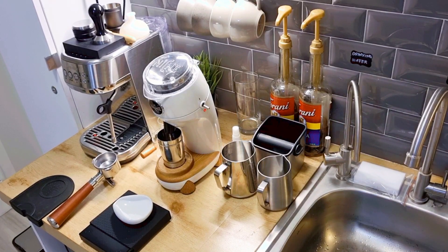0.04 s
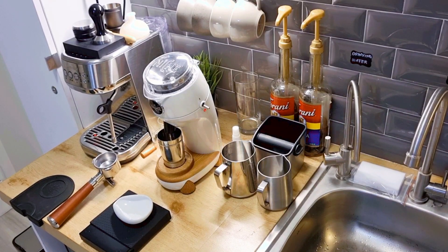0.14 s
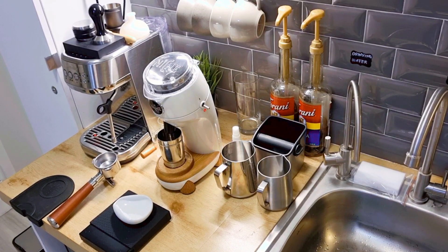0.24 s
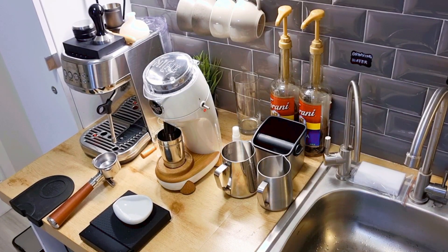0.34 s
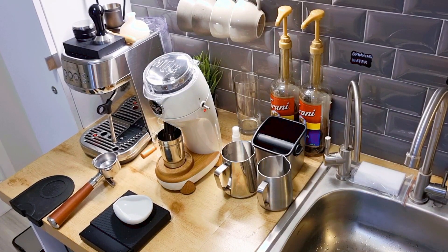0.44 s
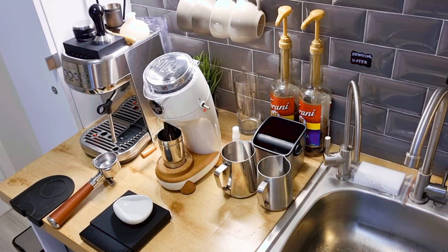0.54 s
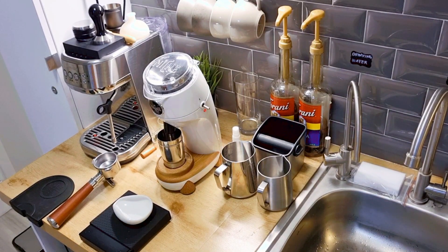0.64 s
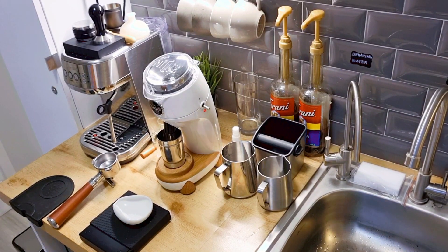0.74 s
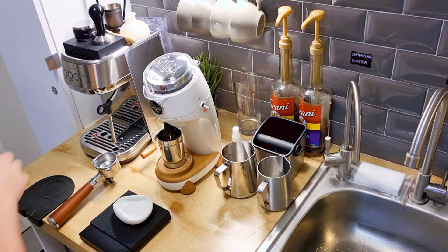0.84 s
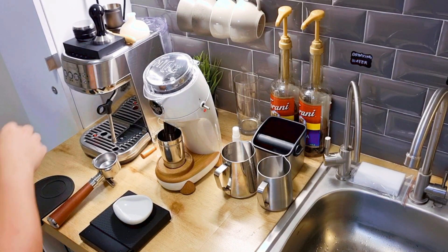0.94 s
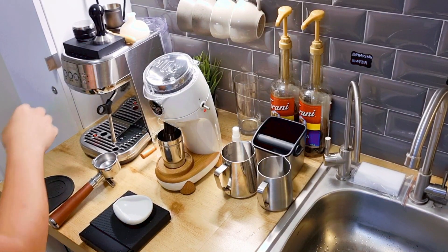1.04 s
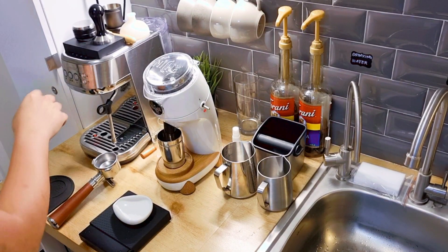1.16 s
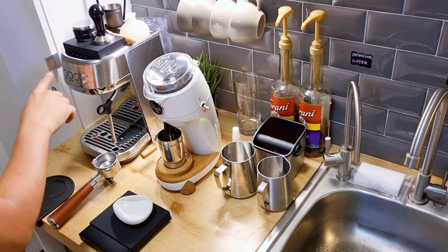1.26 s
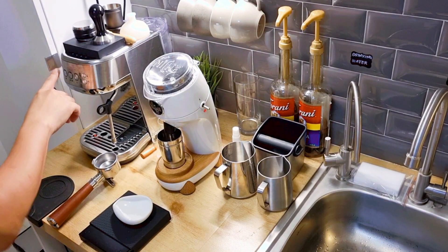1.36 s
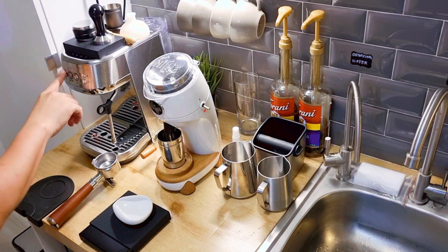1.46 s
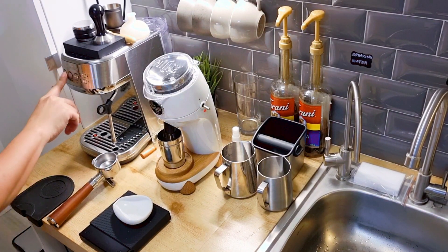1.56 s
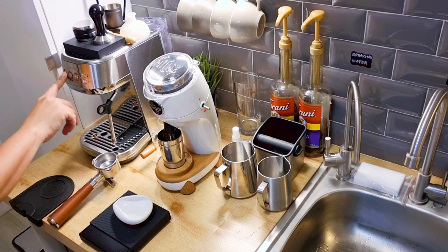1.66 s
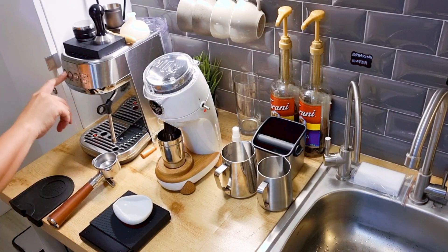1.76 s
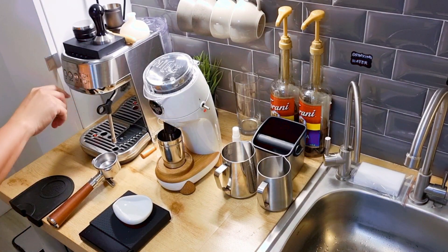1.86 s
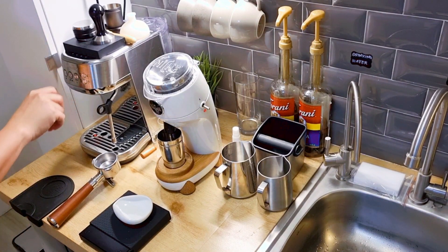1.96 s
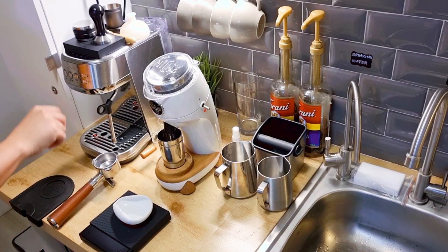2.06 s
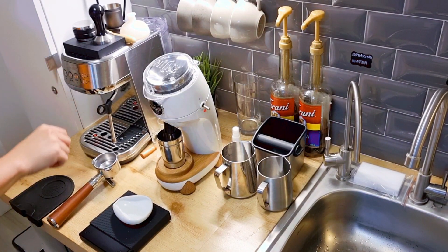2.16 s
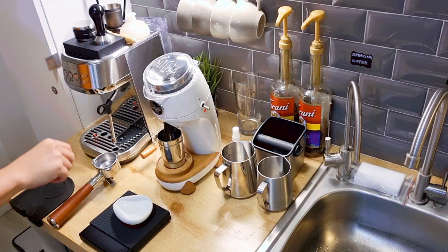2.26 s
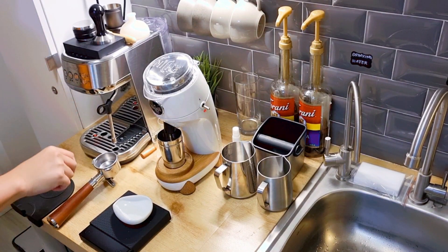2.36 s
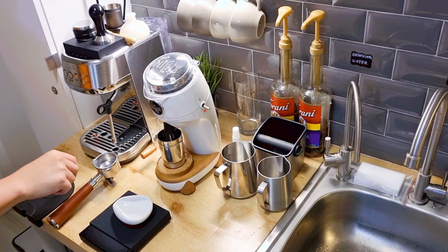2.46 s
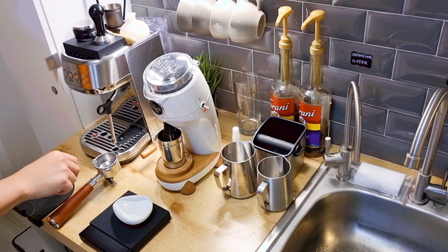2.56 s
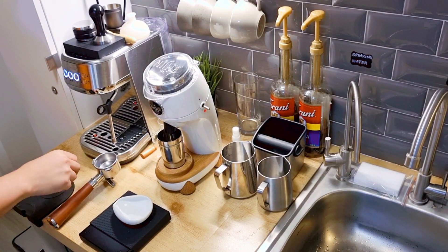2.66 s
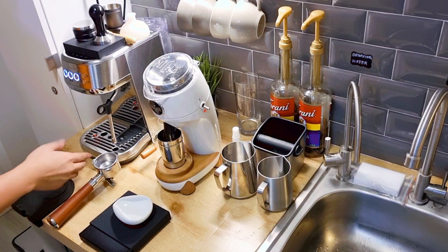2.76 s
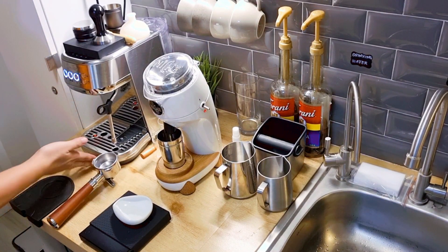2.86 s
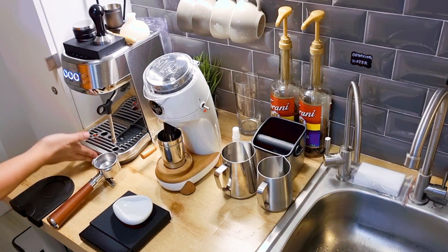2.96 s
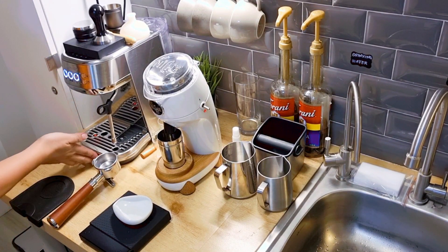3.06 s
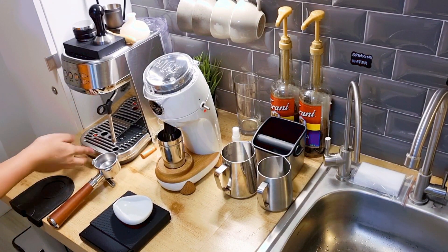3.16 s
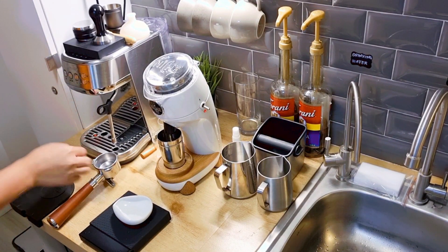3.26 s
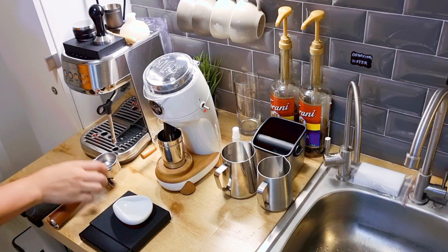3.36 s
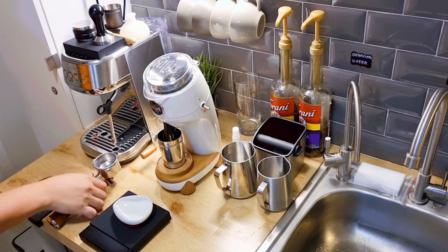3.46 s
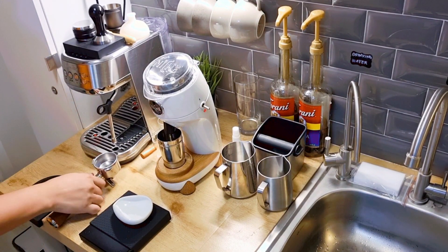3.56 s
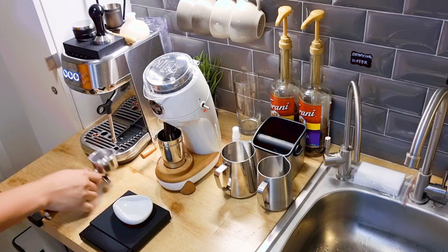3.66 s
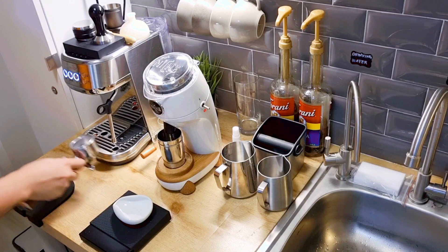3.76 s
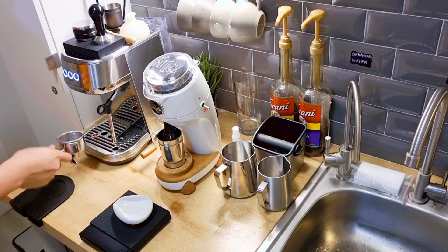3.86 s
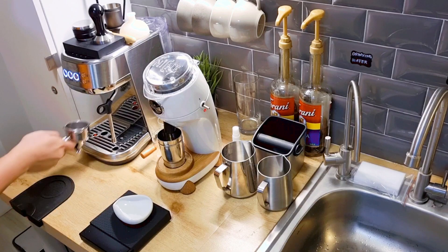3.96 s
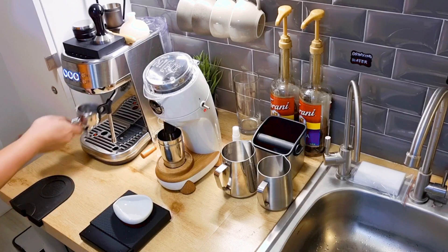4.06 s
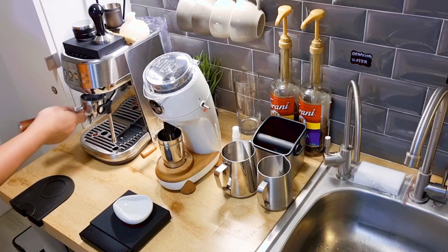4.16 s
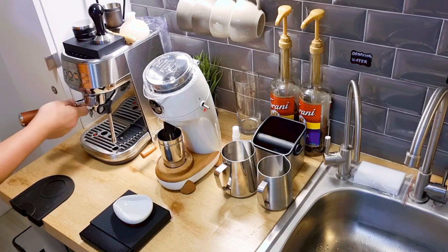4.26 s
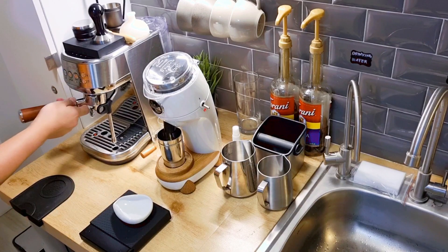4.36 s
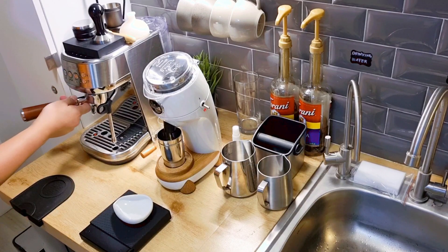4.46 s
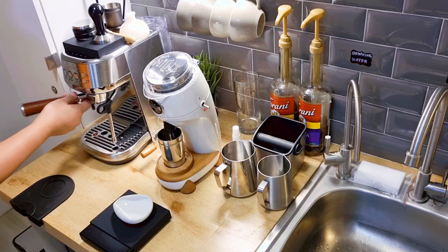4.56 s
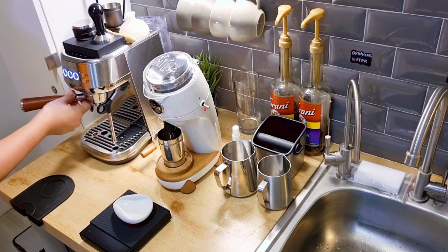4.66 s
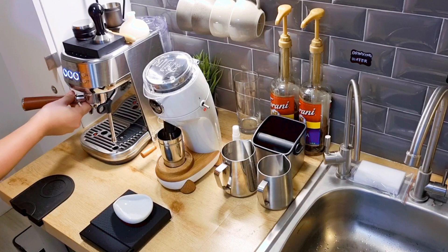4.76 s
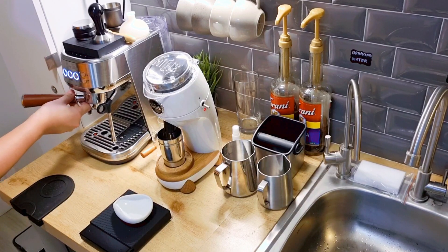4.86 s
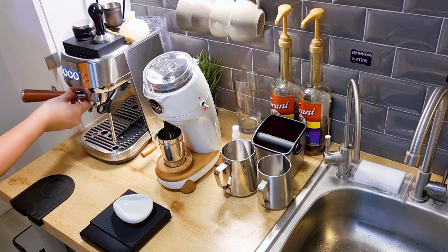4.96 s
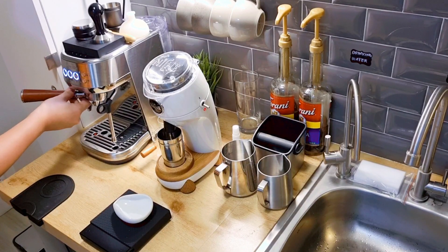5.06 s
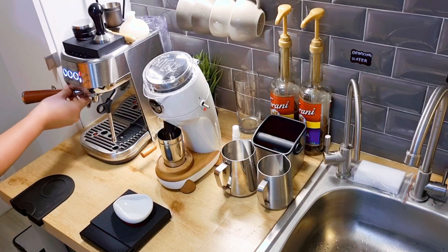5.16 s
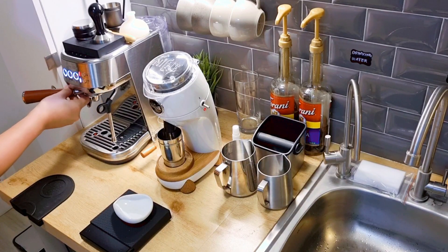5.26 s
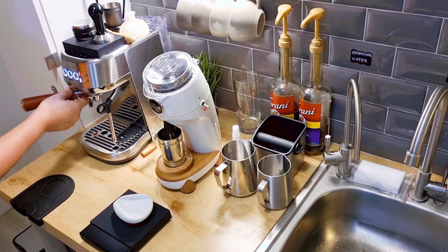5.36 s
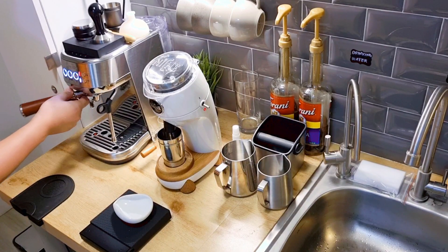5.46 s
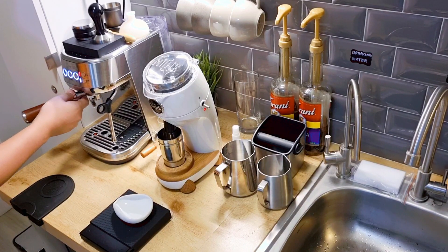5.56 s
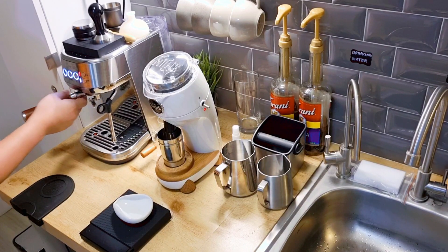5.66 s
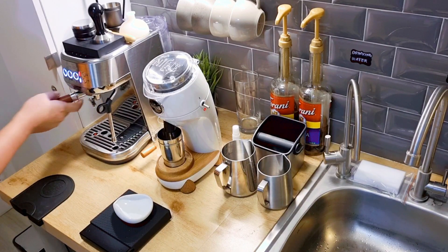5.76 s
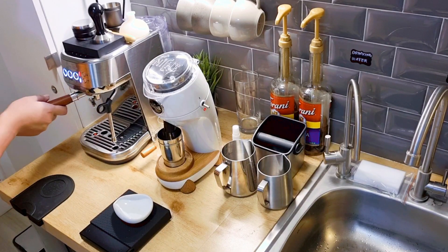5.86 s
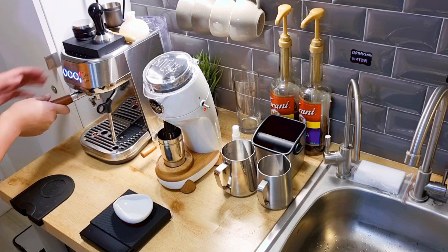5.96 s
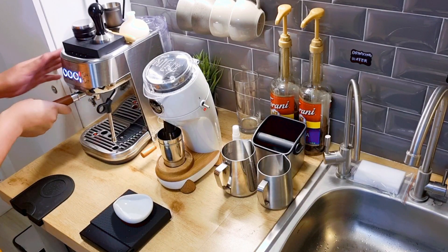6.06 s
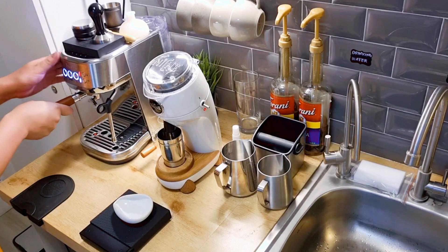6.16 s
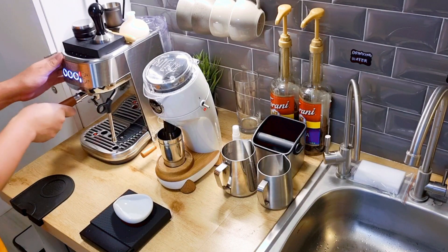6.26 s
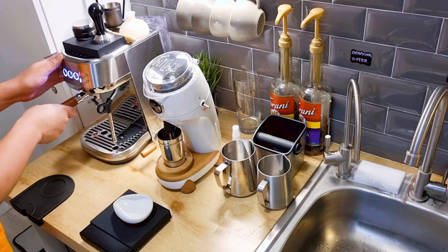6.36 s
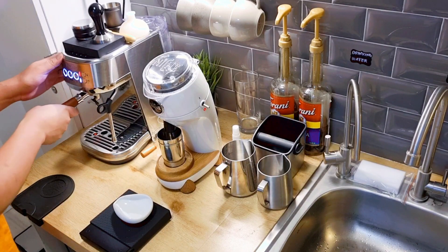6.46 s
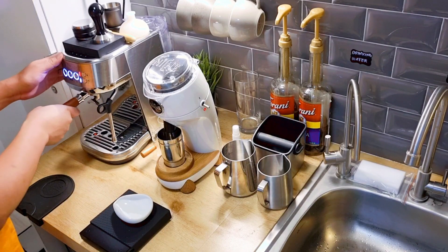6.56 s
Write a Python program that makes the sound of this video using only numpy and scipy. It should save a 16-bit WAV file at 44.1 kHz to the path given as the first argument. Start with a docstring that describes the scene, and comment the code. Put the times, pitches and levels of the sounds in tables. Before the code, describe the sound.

A low appliance hum fills a small tiled kitchen. Clothing rustles softly, a button ticks, and an espresso machine switches on with a quick cluster of plastic clicks. After another click and some soft rubbing, a steel portafilter clanks against the machine, rings briefly, and is twisted into place with knocks and dull thuds. A faint finger slide and small ticks follow. The nearby stereo microphone catches short room reflections.

```python
"""A small tiled kitchen, where an espresso machine is readied over a low appliance hum.
Clothes rustle as an arm reaches out, the power button snaps and the machine clicks on.
A steel portafilter is picked up, clanks against the group head and is knocked and twisted into its seat:
the steel rings, the housing thuds, and fingers slide off with a whisper. The tiles echo the hits."""
import sys
import numpy as np
from scipy import signal
from scipy.fft import rfft, irfft, next_fast_len
from scipy.io import wavfile
from scipy.ndimage import uniform_filter1d

SR = 44100
rng = np.random.default_rng(int(sys.argv[2]) if len(sys.argv) > 2 else 0)


def unload_wav(signal):
    """Save mono or channel-first audio to the path in sys.argv[1] as 16-bit WAV at rate SR, clipped to [-1, 1]."""
    wavfile.write(
        sys.argv[1],
        SR,
        np.round(np.clip(np.atleast_2d(signal).T, -1, 1) * 32767).astype(np.int16),
    )


N = 291501
TIME = np.arange(N) / SR
HIT_TIME = TIME[:SR * 3 // 4]   # time axis of one hit and its tail

# portafilter hits on the group head: (time [s], level of clank, lugs and steel ring [dB], thud level [dB], #
# brightness [dB/octave], chatter decay [s], freedom to ring [0-1])
KNOCKS = [(4.326, -24.5, -40, 3, 0.0028, 0.7), (4.3293, -20, -16, -3, 0.0049, 0.84),
          (4.346, -27, -42, 1, 0.0034, .5), (4.384, -57, -26.5, 3, .003, 0.23),
          (4.44, -56, -24.5, 3, 0.0031, 0.08), (4.541, -50, -33.5, -2, 0.0023, 0.47),
          (4.638, -46.5, -35, -3.5, 0.0034, 0.35), (4.853, -60.5, -38.5, 0.5, .003, 0.6),
          (5.012, -47, -29, -6, 0.0011, 0.44), (5.075, -48.5, -45.5, -5, 0.0045, 0),
          (5.206, -28.5, -19, -3.5, 0.0051, 0.36), (5.252, -35.5, -23.5, -4, 0.0088, 0.4),
          (5.383, -39, -43, -6.5, 0.0014, 0.3), (5.426, -47, -33, -6.5, 0.0033, 0.5),
          (5.469, -54, -37.5, -7, .003, .7), (5.519, -32.5, -34, -6, 0.0036, 0.5),
          (5.546, -27, -30, -3.5, 0.013, 0.33), (5.57, -39, -28.5, -5, .006, 0.4),
          (5.645, -52, -31, -4.5, .005, 0.73)]
# EQ of steel striking steel: (frequency [Hz], gain [dB])
CLANK_EQ = [(80, -6), (400, -2), (720, 0), (1100, -1), (1600, -2), (2400, -5), (3400, -5), (5000, -2),
            (6200, -4), (8000, -1), (12000, -4), (15000, -3)]
# ring of the portafilter's steel: (frequency [Hz], level [dB], ungripped t60 [s])
STEEL_MODES = [(990, -3, .35), (1028, 3.5, .4), (1065, 14, .08), (1092, 1.5, .3), (1157, 4, .3),
               (1220, 6, .08), (1430, 4, .1), (1490, -6, .38), (1762, 1, .28), (2320, 4, .17),
               (2374, 2, .38), (3270, -3, .13), (3591, -8, .28), (4530, 3, .16), (4640, 1, .3),
               (4782, 7, .36), (4850, 5, .22), (4915, 3, .38), (5518, -3, .26), (7246, -6, .3)]
# ring of the locking lugs, pressed into their seat: (frequency [Hz], level [dB], t60 [s])
LUG_MODES = [(1380, -9.5, 0.13), (1820, 2.5, 0.3), (1935, -2.5, 0.24), (2580, -4.5, .16), (2780, 4, 0.25),
             (3240, 1.5, 0.21)]
# low body of the machine's housing: (frequency [Hz], level [dB], ungripped t60 [s])
HOUSING_MODES = [(114, -20.5, 0.69), (229.6, -15, 0.22), (264, 1.5, 0.14), (260, -19, 0.78),
                 (278, -17.5, 0.52), (316, -14.5, 0.35), (379.6, -12.5, 0.3), (431, -23.5, 0.63),
                 (494, -16.5, 0.25)]


def portafilter(attack_s=0.0012, steel_db=5, lugs_db=-15, grip_power=4.7):
    """Each knock layers a clank, a ring and a housing thud; a firm grip trades steel ring for lugs."""
    out = np.zeros((2, N))
    attack = 1 - np.exp(-HIT_TIME / attack_s)   # heavy parts take a moment to start moving
    for s, level_db, thud_db, tilt_db, chatter_s, freedom in KNOCKS:
        clank = kitchen(equalise(contact(chatter_s), CLANK_EQ), direct_db=19, room_db=30)
        steel = ring(STEEL_MODES, freedom, spread_db=1, spread_rad=.4)
        steel = kitchen(steel, direct_db=-12, room_db=-19)
        steel *= from_db(steel_db) * freedom ** grip_power * attack
        lugs = ring(LUG_MODES, freedom=1, spread_db=3.5, spread_rad=.8)
        lugs *= from_db(lugs_db) * (1 - freedom)
        tilt_eq = [(hz, level_db + tilt_db * np.log2(hz / 1500)) for hz in (500, 16000)]
        add(out, s, equalise(clank + lugs + steel, tilt_eq))
        thud = from_db(thud_db) * attack * ring(HOUSING_MODES, freedom, spread_db=2, spread_rad=0.68)
        add(out, s, kitchen(thud, direct_db=1.5, room_db=-2.5))
    return out


# button, switch and light handling clicks: (time [s], thump [dB], body [dB], mid [dB], snap [dB],
# treble [dB], chatter decay [s], direct level [dB])
CLICKS = [(.851, -35, -39, -46, -59, -70, .012, -11), (1.4177, -41, -39, -35, -34.5, -31.5, 0.00079, -19),
          (1.708, -54, -57, -52, -41.5, -59, .0007, -3),
          (1.7783, -18.5, -21.5, -39, -41.5, -47, 0.001, -15),
          (1.794, -52, -52, -27, -39, -36, 0.0099, -20),
          (1.806, -31, -20.5, -25.5, -38, -46, 0.00054, -4.5),
          (1.812, -31.5, -23.5, -28, -31.5, -35, 0.0075, -9),
          (1.829, -32, -30.5, -33.5, -38, -47, .005, -11), (1.883, -26, -25.5, -33, -53, -49, .003, -9),
          (3.0299, -33.5, -37.5, -33.5, -34, -34.5, 0.0015, -14),
          (3.0436, -32.5, -27, -29, -37.5, -37, .004, -17), (3.266, -53, -46, -44.5, -64, -73, .013, -17),
          (6.346, -51, -44.5, -54, -57, -66, 0.0044, -10), (6.4194, -56, -66, -39.5, -50, -55, .0008, -7)]
# EQ points for thump, body, mid, snap and treble: (frequency [Hz])
CLICK_BANDS_HZ = (250, 560, 1700, 3800, 6500)
# ring of the panels around the buttons: (frequency [Hz], level [dB], t60 [s])
PANEL_MODES = [(336, -13, 0.27), (440, -3.5, 0.15), (597, -2, 0.24), (805, 1, 0.17), (887, -4, 0.072),
               (985, -2, 0.07), (1055, 1, 0.16), (1378, 0.5, 0.1), (1675, 0, 0.11), (2140, -6, .12),
               (3080, -15, 0.12), (4230, -7, 0.13)]
# EQ over all the clicks: (frequency [Hz], gain [dB])
CLICK_EQ = [(150, -18.5), (260, 0.5), (400, 5.5), (600, 2.5), (850, 0.5), (1300, -2), (1900, -0.5),
            (2900, 0.5), (4000, 3.5), (6000, 7), (15000, 6)]


def clicks(gain_db=33, panel_db=-44):
    """Plastic parts snap and set the panels ringing briefly; the room gives them their tail."""
    out = np.zeros((2, N))
    for s, *bands_db, chatter_s, direct_db in CLICKS:
        snap = kitchen(contact(chatter_s), direct_db, room_db=2)
        panel = from_db(panel_db) * ring(PANEL_MODES, freedom=1, spread_db=-1, spread_rad=0.89)
        add(out, s, equalise(snap + panel, list(zip(CLICK_BANDS_HZ, bands_db))))
    return from_db(gain_db) * equalise(out, CLICK_EQ)


# cloth swishes, one per arm stroke: (start [s], length [s], relative peak [dB], extra sheen [dB])
SWISHES = [(0.032, 0.44, -71, -2.5), (0.46, 0.21, -61, 2), (0.694, 0.15, -59.5, -3),
           (0.83, 0.068, -55.5, -6), (1.166, 0.23, -50.5, -0.5), (1.382, 0.07, -58, 3.5),
           (1.565, 0.19, -61, -0.5), (1.832, 0.082, -53, 2), (2.018, 0.38, -76.5, 2),
           (5.908, 0.13, -70.5, -2)]
# EQ of the cloth's hiss: (frequency [Hz], gain [dB])
CLOTH_EQ = [(300, -18), (900, -4.5), (1800, -10), (3200, -5.5), (5000, 3), (7500, 0.5), (12000, 7.5),
            (16000, 5.5)]


def sleeve(gain_db=22, grain_db=-0.5, folds_db=1.54, weave_db=-15, sheen_above_hz=8000):
    """Fibres catch and slip: a grainy hiss and sheen ride the arm's speed, uneven as the folds pass."""
    body_power = sheen_power = 0
    for s, length_s, db, sheen_db in SWISHES:   # each dies away in the room, its sheen first
        body_power += from_db(db + stroke_db(s, length_s, fade_db_per_s=128.5)) ** 2
        sheen_power += from_db(db + sheen_db + stroke_db(s, length_s, fade_db_per_s=220)) ** 2
    grain = unit_rms(uniform_filter1d(rng.standard_normal(N), size=200))
    folds = unit_rms(uniform_filter1d(rng.standard_normal(N), size=1500))
    hiss = shaped_noise(CLOTH_EQ)
    sheen = signal.sosfiltfilt(signal.butter(2, sheen_above_hz, "high", fs=SR, output="sos"), hiss)
    envelope = np.sqrt(body_power)
    body = envelope * (hiss - sheen + from_db(weave_db) * weave(envelope))
    texture = from_db(gain_db + grain_db * grain + folds_db * folds)
    return texture * (body + np.sqrt(sheen_power) * sheen)


def stroke_db(start_s, length_s, fade_db_per_s, speed_power=1.6):
    """Envelope of one arm stroke: the level follows a half sine of speed, then a steady release."""
    speed = np.sin(np.pi * np.clip((TIME - start_s) / length_s, 0, 1))
    level_db = speed_power * 20 * np.log10(speed + 1e-6)
    fade_db = fade_db_per_s * TIME
    return np.maximum.accumulate(level_db + fade_db) - fade_db


def weave(envelope, top_hz=4100, width_hz=1700, octaves_per_doubling=.17):
    """Threads riding over each other sing in a broad band that sweeps with the arm's speed."""
    centre_hz = top_hz * (envelope / envelope.max()) ** octaves_per_doubling
    lowpass = signal.butter(2, width_hz / 2, fs=SR, output="sos")
    real, imaginary = signal.sosfilt(lowpass, rng.standard_normal((2, 2, N)))
    carrier = np.exp(2j * np.pi * np.cumsum(centre_hz) / SR)
    return unit_rms(np.real((real + 1j * imaginary) * carrier))


# soft rubs of hand, handle and counter: (peak time [s], swell time [s], level [dB], centre [Hz])
RUBS = [(0.481, 0.11, -51, 320), (0.579, 0.031, -46.5, 815), (0.886, 0.014, -46.5, 760),
        (1.34, 0.057, -47, 433), (1.282, 0.11, -56, 950), (1.706, 0.028, -38.5, 510),
        (3.569, 0.022, -40.5, 124), (3.672, 0.015, -35, 464), (3.706, 0.036, -43.5, 504),
        (4.301, 0.02, -40, 383), (5.401, 0.012, -41.5, 730), (5.577, 0.023, -34.5, 122),
        (5.585, 0.034, -34, 333)]


def rubs(relative_width=0.65):
    """Soft friction swells and fades in one broad resonance."""
    out = np.zeros((2, N))
    middle_s = HIT_TIME.mean()
    for s, swell_s, db, hz in RUBS:
        swell = 1 / np.cosh((HIT_TIME - middle_s) / swell_s)
        friction = resonant_noise(hz, relative_width * hz, len(HIT_TIME))
        add(out, s - middle_s, from_db(db) * swell * friction)
    return out


def fingers(peak_s=5.9, swell_s=.06, level_db=-54):
    """Skin slides off polished steel with a thin, high whisper."""
    swell = from_db(level_db) / np.cosh((TIME - peak_s) / swell_s)
    return swell * resonant_noise(hz=13500, width_hz=5000, size=N)


# low room resonances where the hum booms: (frequency [Hz], width [Hz], relative level [dB])
HUM_MODES = [(37.7, 4, -59.5), (62.2, 5, -52.5), (70.5, 14, -45.5), (92.65, 8.2, -43.5), (108.9, 4.1, -57),
             (189.6, 16, -57), (268.1, 5, -58)]
# EQ of the room's air: (frequency [Hz], gain [dB])
AIR_EQ = [(25, -23), (100, 9.5), (140, 0), (320, 5), (550, -2), (900, -1), (1300, -6), (1700, -10.5),
          (3200, -14.5), (5000, -18.5), (8000, -23), (16000, -15)]


def hum(gain_db=1.46, fade_db_per_s=0.42, swell_db=2.5, peak_s=0.8, swell_s=0.24, air_db=-48):
    """An appliance drones in the room's low resonances, swelling once and easing down, over soft air."""
    drone = sum(from_db(db) * resonant_noise(hz, width_hz, N) for hz, width_hz, db in HUM_MODES)
    air = from_db(air_db) * shaped_noise(AIR_EQ)
    lift_db = swell_db / np.cosh((TIME - peak_s) / swell_s)
    return drone * from_db(gain_db - fade_db_per_s * TIME + lift_db) + air


# reverb time of the tiled room: (frequency [Hz], t60 [s])
KITCHEN_T60 = [(100, 0.72), (500, 0.45), (3000, 0.54), (6000, 0.34), (14000, 0.2)]


def kitchen(x, direct_db, room_db, early_boost=0.55, early_s=0.05):
    """Direct sound, dense early reflections off the tiles, then a tail whose treble dies first."""
    size = len(HIT_TIME)
    field = rfft(diffuse_noise(size))
    centres_hz = np.geomspace(125, 16000, num=8)
    tail = 0
    for hz, share in zip(centres_hz, np.eye(len(centres_hz))):
        band_gain = at_hz(list(zip(centres_hz, share)), frequencies(size))
        decay = np.exp(-np.log(1000) * HIT_TIME / at_hz(KITCHEN_T60, hz))
        tail += irfft(field * band_gain, size) * decay
    early_lift = 1 + early_boost * np.exp(-HIT_TIME / early_s)
    impulse_response = unit_rms(tail * early_lift) / np.sqrt(size)
    reverb = signal.fftconvolve(np.atleast_2d(x), impulse_response, axes=1)[:, :size]
    return from_db(direct_db) * x + from_db(room_db) * reverb


# stereo image of the room, narrow lows and wide highs: (frequency [Hz], left-right coherence [0-1])
COHERENCE = [(100, 0.985), (260, 1), (500, 0.49), (1200, 0.87), (2500, 0.32), (5000, 0.058), (14000, .03)]


def diffuse_noise(size):
    """White noise arriving from all round, as the two microphones hear it."""
    coherence = at_hz(COHERENCE, frequencies(size))
    mid, side = rfft(rng.standard_normal((2, size)))
    mid, side = mid * np.sqrt(1 + coherence), side * np.sqrt(1 - coherence)
    return unit_rms(irfft([mid + side, mid - side], size))


def shaped_noise(eq):
    """A scene-long bed of diffuse noise through an EQ curve."""
    return unit_rms(equalise(diffuse_noise(next_fast_len(N))[:, :N], eq))


def resonant_noise(hz, width_hz, size):
    """Diffuse noise in one steep-sided resonance."""
    padded = next_fast_len(size)
    f = frequencies(padded) + 1
    detune = (f * f - hz * hz) / (f * width_hz)
    spectrum = rfft(diffuse_noise(padded)) / (1 + detune ** 2)
    return unit_rms(irfft(spectrum, padded)[:, :size])


def contact(chatter_s, grains_per_s=1500):
    """A sharp transient and a dying chatter of random touches; unit energy."""
    size = len(HIT_TIME)
    touches = rng.standard_normal(size) * (rng.random(size) < grains_per_s / SR)
    touches[0] = 2
    touches *= np.exp(-HIT_TIME / chatter_s)
    return touches / np.linalg.norm(touches)


def ring(modes, freedom, spread_db, spread_rad):
    """Decaying sines, choked by a firm grip; each has its own level and phase at each microphone."""
    hz, db, t60 = np.transpose(modes)[:, :, None]
    level_jitter, phase_jitter = rng.standard_normal((2, 2, len(modes), 1))
    decay = np.exp(-np.log(1000) * HIT_TIME / (t60 * max(freedom, .1)))
    partials = decay * np.exp(2j * np.pi * hz * HIT_TIME)
    weights = from_db(db + spread_db * level_jitter) * np.exp(1j * spread_rad * phase_jitter)
    return np.imag(weights[:, :, 0] @ partials)


def equalise(x, eq):
    """Minimum-phase EQ through (frequency [Hz], gain [dB]) points: no pre-ring on transients."""
    size = 2 * next_fast_len(x.shape[-1] // 2 + SR // 20)
    gain = from_db(at_hz(eq, frequencies(size)))
    cepstrum = irfft(np.log(gain))
    cepstrum[1:size // 2] *= 2
    cepstrum[size // 2 + 1:] = 0
    return irfft(rfft(x, size) * np.exp(rfft(cepstrum)))[..., :x.shape[-1]]


def add(out, s, sound):
    """Mix a sound in at its cue."""
    start = max(round(s * SR), 0)
    out[:, start:start + sound.shape[1]] += sound[:, :N - start]


def at_hz(curve, hz):
    """Read a curve on a log-frequency axis."""
    f, value = np.transpose(curve)
    return np.interp(np.log(hz + 1), np.log(f), value)


def frequencies(size):
    """Frequency of each bin of a real transform."""
    return np.arange(size // 2 + 1) * SR / size


def from_db(db):
    """Decibels to gain."""
    return 10 ** (np.asarray(db) / 20)


def unit_rms(x):
    """Scale to unit power."""
    return x / np.sqrt(np.mean(x ** 2) + 1e-20)


def scene():
    """The mix of all sources in the kitchen."""
    return clicks() + portafilter() + rubs() + sleeve() + fingers() + hum()


# balance of the microphone ports: (frequency [Hz], left minus right [dB])
BALANCE = [(80, -4.5), (300, -3), (1000, -2.5), (2500, -1), (5000, -0.5), (8000, 7), (13000, 3)]
# phase between the ports: (frequency [Hz], left lead [rad])
LEFT_LEAD = [(30, .08), (100, .26), (280, .7), (600, 1.6), (1100, 1.85), (2000, 2.0), (5000, 1.4)]
# microphone EQ with a deep treble notch: (frequency [Hz], gain [dB])
MICROPHONE_EQ = [(3000, -1), (5000, -11), (6400, -14.5), (7600, -23.5), (8800, -34.5), (10200, -29),
                 (12500, -24.5), (15500, -22.5)]


def record(dry, cutoff_hz=15800):
    """Two microphone ports differ in level and phase, and share a treble notch and a steep high cut."""
    size = next_fast_len(N + SR // 10)
    hz = frequencies(size)
    left = from_db(at_hz(BALANCE, hz) / 2) * np.exp(1j * at_hz(LEFT_LEAD, hz) / 2)
    ports = irfft(rfft(dry, size) * [left, 1 / left], size)[:, :N]
    high_cut = signal.ellip(10, .2, 80, cutoff_hz, fs=SR, output="sos")
    return signal.sosfilt(high_cut, equalise(ports, MICROPHONE_EQ))


dry = scene()
out = record(dry)
unload_wav(out)
```